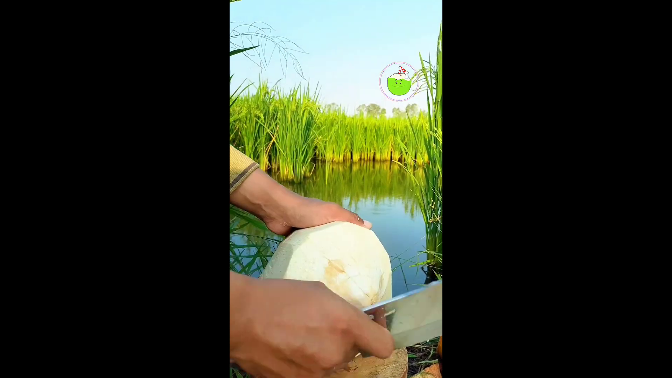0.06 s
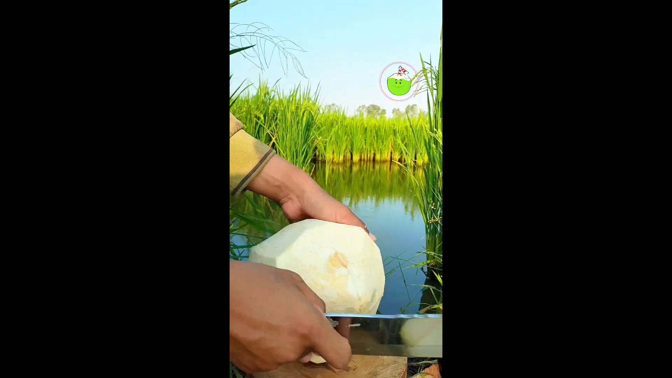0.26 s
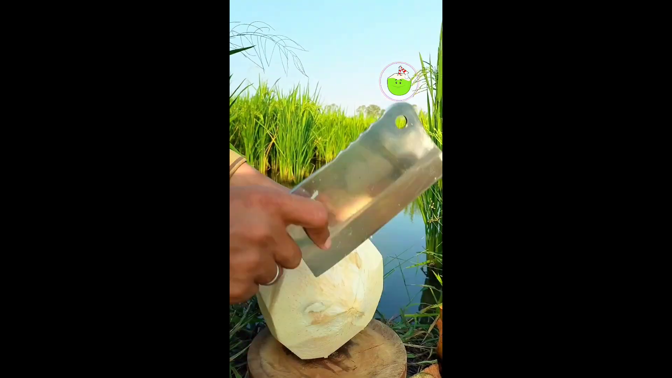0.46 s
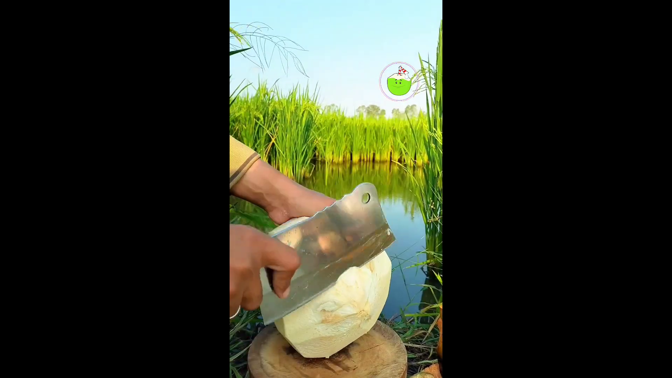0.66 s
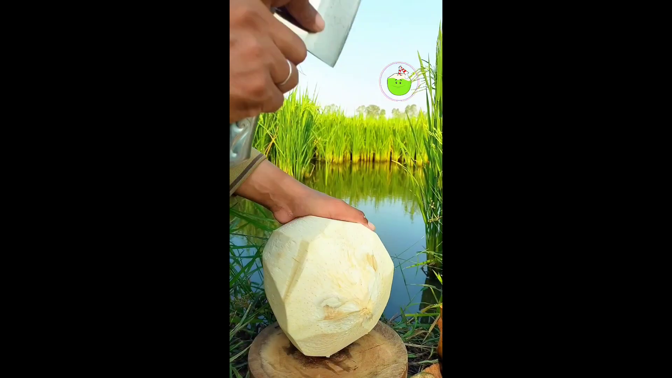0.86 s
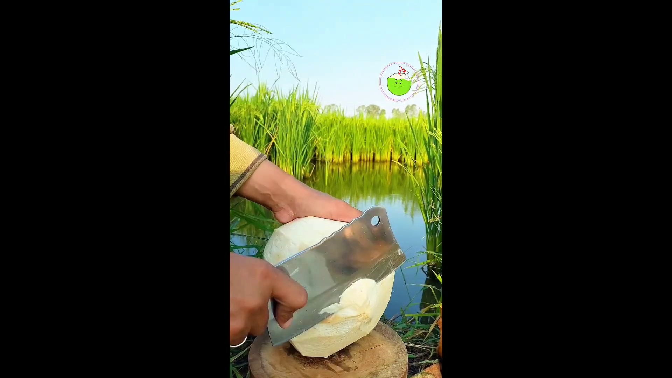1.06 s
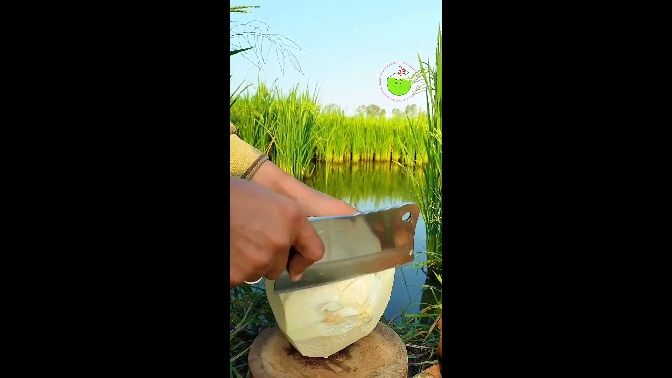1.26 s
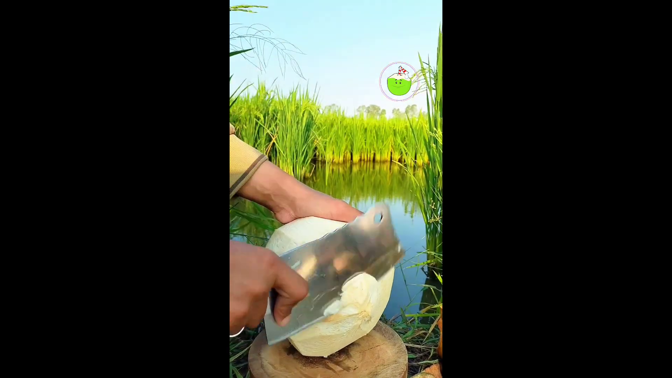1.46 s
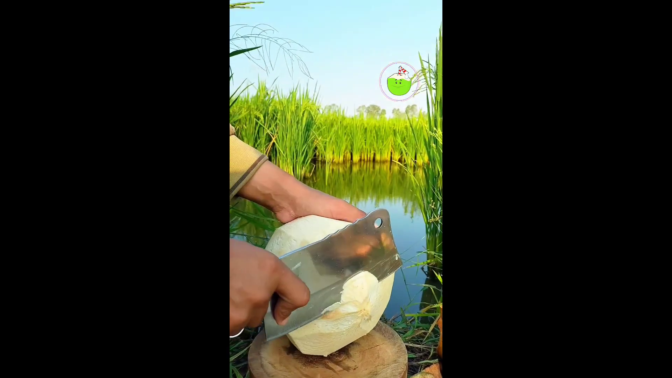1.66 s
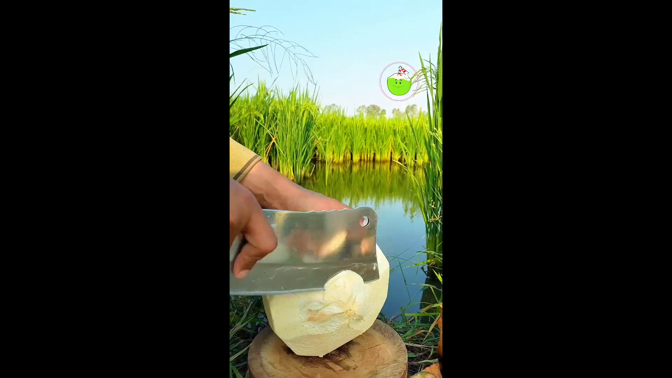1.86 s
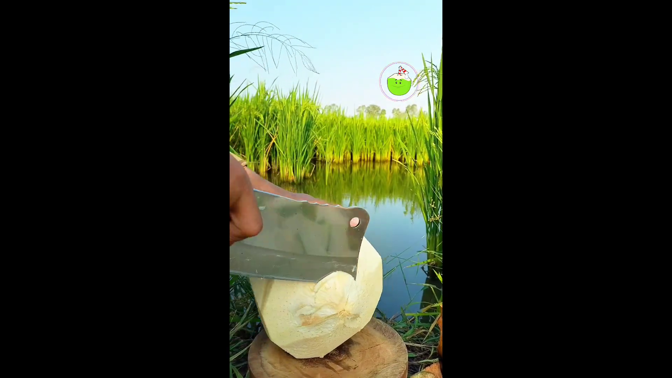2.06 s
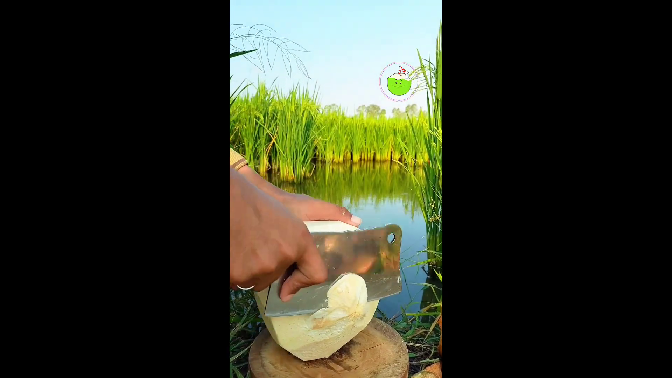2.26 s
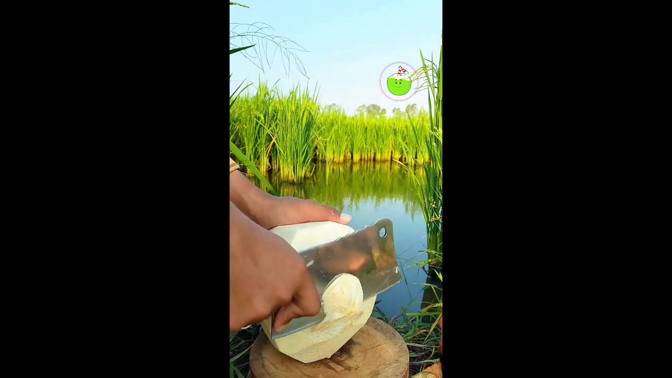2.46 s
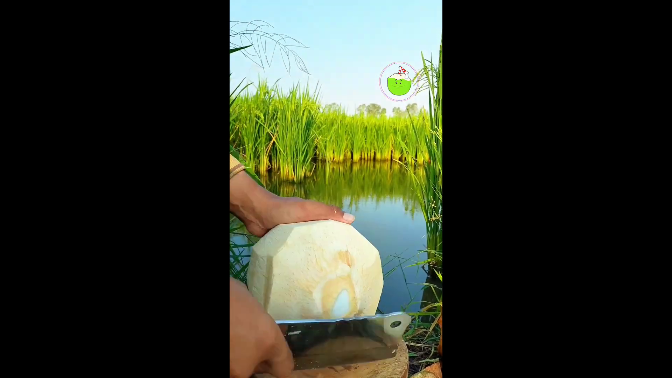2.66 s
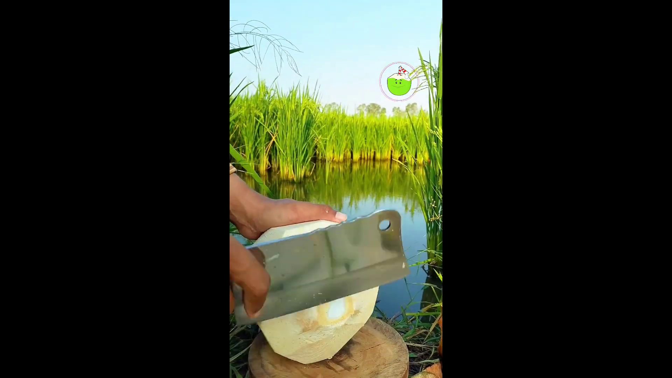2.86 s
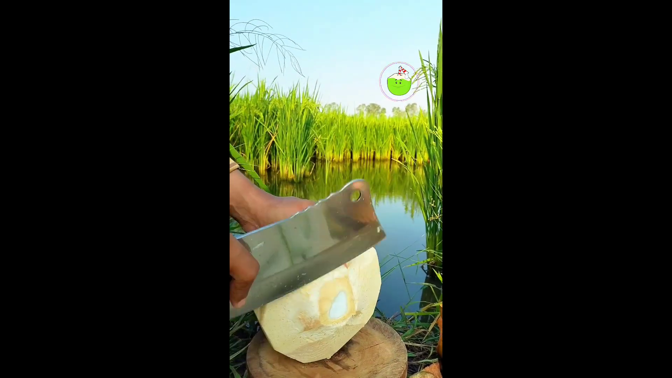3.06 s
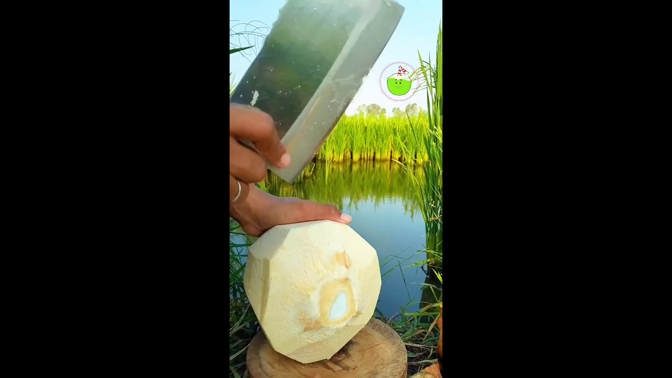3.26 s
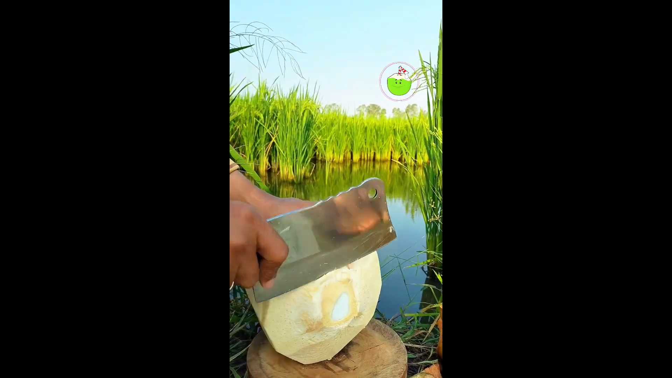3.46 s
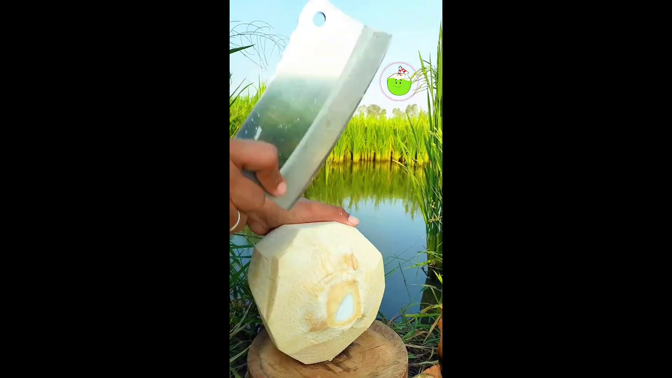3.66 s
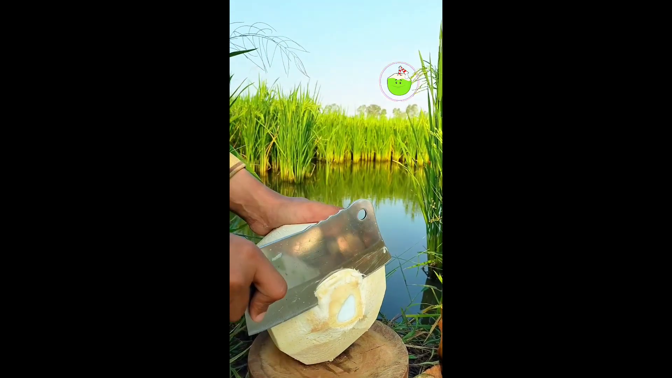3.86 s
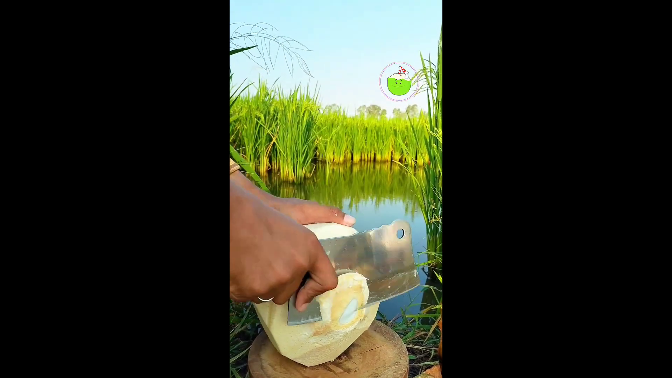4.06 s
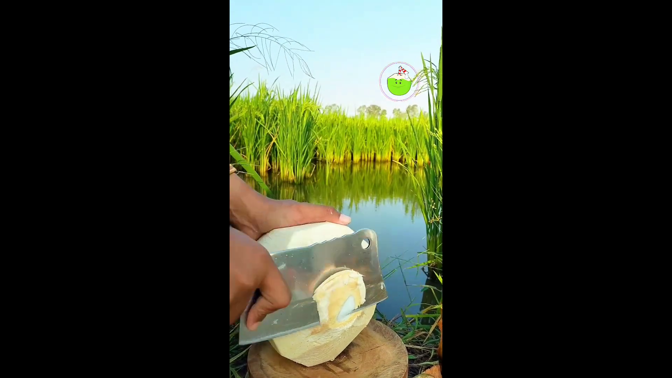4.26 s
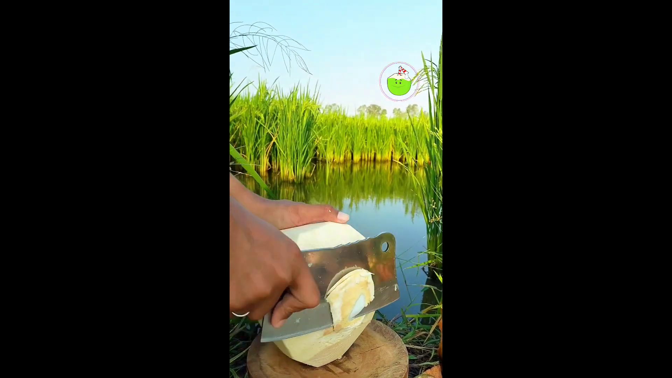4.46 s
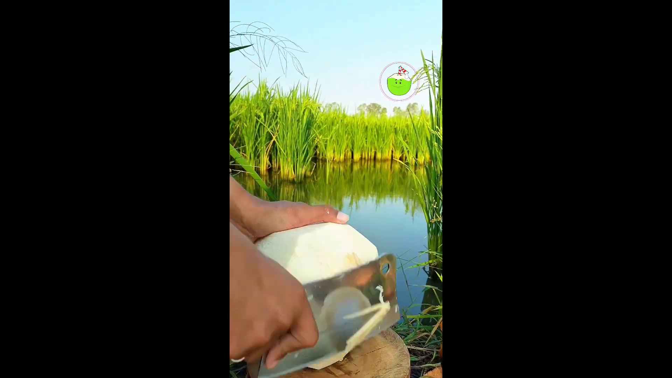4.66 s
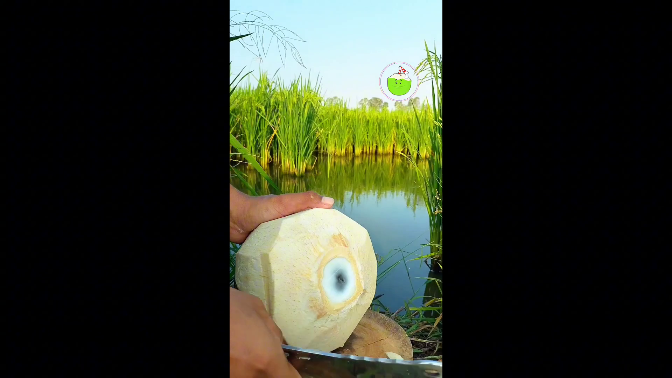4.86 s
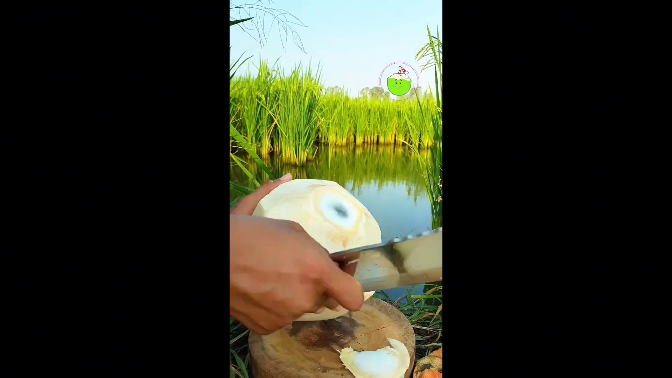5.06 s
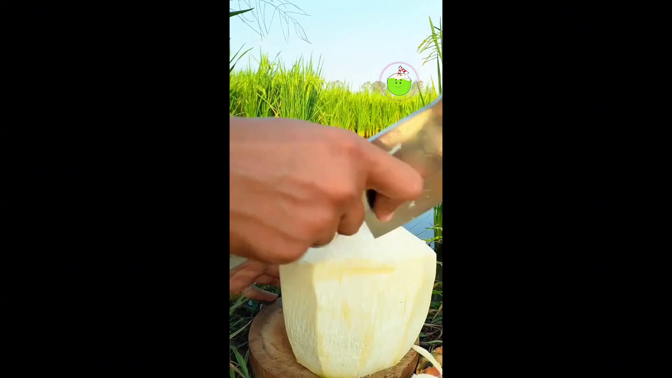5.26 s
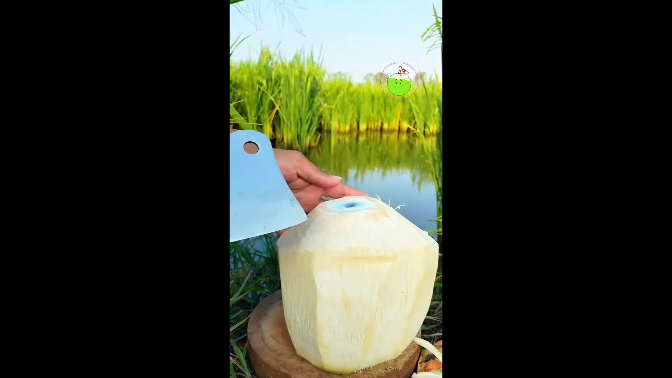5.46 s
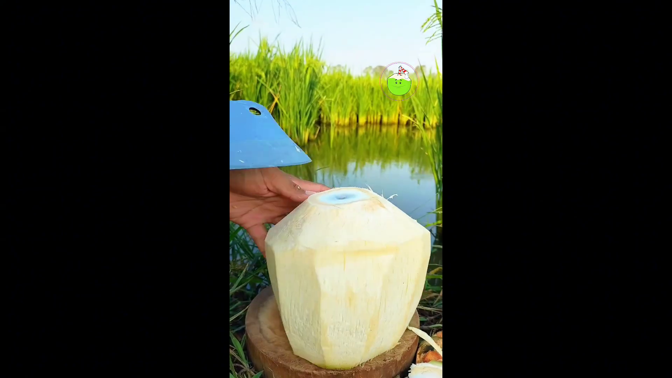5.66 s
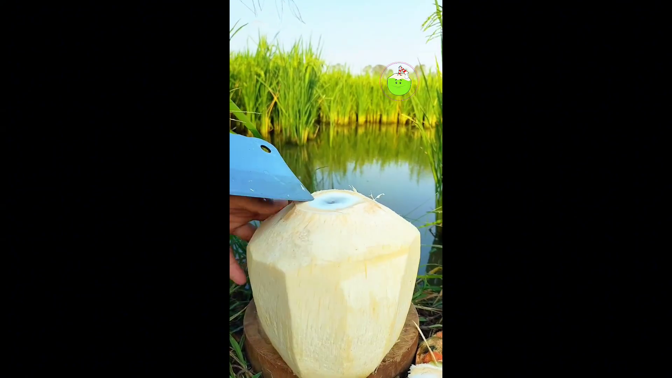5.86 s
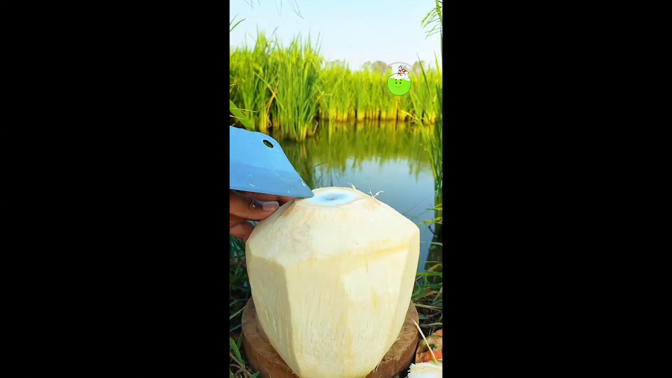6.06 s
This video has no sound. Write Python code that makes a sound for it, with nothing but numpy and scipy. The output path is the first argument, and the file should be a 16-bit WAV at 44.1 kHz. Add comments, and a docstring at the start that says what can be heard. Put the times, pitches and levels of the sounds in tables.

```python
"""A cleaver chops and shaves the husk of a green coconut on a wooden block beside a pond.
A low rumble and airy hiss last throughout. At first faint whistles, chirrups on the left and a soft brush are heard.
Then chops begin, each a burst of fibres, a nut knock, a block thump and a faint blade ring, with noisy shaving between.
From one second a run of rising whistles on the right swells into echoes from the bank until nearly three.
Chirrups, sparser whistles and clusters of blows follow; soft rubbing and short whistles come last."""
import sys
import numpy as np
from scipy import signal
from scipy.fft import rfft, irfft, next_fast_len
from scipy.io import wavfile
from scipy.ndimage import map_coordinates

SR = 44100
rng = np.random.default_rng(int(sys.argv[2]) if len(sys.argv) > 2 else 0)


def file_out(sig):
    """Save sig as 16-bit WAV at sys.argv[1]."""
    # one column per channel
    cols = np.atleast_2d(sig).T
    # limit, then scale
    lim = np.clip(cols, -1, 1)
    pcm = np.round(lim * 32767).astype(np.int16)
    wavfile.write(sys.argv[1], SR, pcm)


N = 269892

# How long the bank's echo lasts in each band. Each row: frequency in Hz, time to fall by 60 dB in s.
BANK_DECAY = [(500, 0.14), (3000, 1.15), (5000, 1.115), (8000, 0.39)]


def amp(db):
    """Decibels to a linear factor."""
    return 10 ** (np.asarray(db) / 20)


def unit(x):
    """Scale a sound to an rms of 1."""
    return x / np.sqrt(np.mean(x ** 2) + 1e-20)


def along(points, hz):
    """Read a curve of (Hz, value) points on a log frequency axis."""
    f, v = np.transpose(points)
    return np.interp(np.log(hz + 1), np.log(f + 1), v)


def filtered(x, response):
    """Shape the spectrum of x by a response that is a function of frequency."""
    n = x.shape[-1]
    padded = next_fast_len(n + 4096)
    hz = np.fft.rfftfreq(padded, 1 / SR)
    return irfft(rfft(x, padded) * response(hz), padded)[..., :n]


def add(track, s, sound):
    """Mix a stereo sound in at time s."""
    start = max(round(s * SR), 0)
    part = sound[:, :max(N - start, 0)]
    track[:, start:start + part.shape[1]] += part


def noise(spectrum, size, apart_hz, spiky_db=0):
    """Stereo noise of rms 1: snaps of uneven size, nearly alike in both ears well below apart_hz."""
    snaps = rng.standard_normal((2, size)) * amp(spiky_db * rng.standard_normal(size))

    def mid_side_response(hz):
        width = np.array([np.ones_like(hz), hz / np.hypot(hz, apart_hz)])
        return amp(along(spectrum, hz)) * width

    mid, side = filtered(snaps, mid_side_response)
    return unit(np.array([mid + side, mid - side]))


def ring(modes, t):
    """Sum damped modes of (Hz, dB, t60 s), struck at new strengths and signs each time."""
    strengths = rng.choice([-1, 1], len(modes)) * amp(2 * rng.standard_normal(len(modes)))
    total = 0
    for strength, (hz, db, t60) in zip(strengths, modes):
        total = total + strength * amp(db - 60 * t / t60) * np.sin(2 * np.pi * hz * t)
    return total


def wavering(t):
    """A smooth random wander of pitch, with 260 new random points a second."""
    return map_coordinates(rng.standard_normal(256), [t * 260], mode="mirror")


def placed(x, pan_db, lead):
    """Set a source on the right: louder there by pan_db, and earlier by lead seconds."""
    ears = np.array([[-1], [1]])
    shifted = filtered(x, lambda hz: np.exp(1j * np.pi * hz * lead * ears))
    return shifted * amp(ears * pan_db / 2)


def echo(x, decay, build):
    """A new diffuse stereo tail that swells over build seconds and dies at its own pace in each band."""
    hz, t, z = signal.stft(rng.standard_normal((2, SR)), SR, nperseg=256)
    fall = amp(-60 * t / along(decay, hz)[:, None])
    tail = signal.istft(z * fall * (1 - np.exp(-t / build)), SR, nperseg=256)[1]
    return signal.fftconvolve(x[None], tail / np.linalg.norm(tail[0]), axes=1)


def chops(crack_db=-3, slab_db=2, nut_db=0, pulp_db=-4, thump_db=2, blade_db=-27, debris_db=-28,
          slab_cycles=20, stop=0.002, ground_db=-31):
    """Fibres burst while the edge travels; the nut knocks, the block thumps and the steel rings on."""
    # Blade blows, levels before the trims above.
    # Each row: start in s, crack level in dB, slab level in dB, slab pitch in Hz, kind of blow.
    blows = [(.6848, -27, -34.5, 1000, "tap"), (1.0428, -16.5, -22, 370, "chop"),
             (1.5208, -14.5, -22, 617, "chop"), (1.802, -55, -39, 930, "tap"),
             (2.520, -14, -33, 736, "snap"), (2.5265, -13.5, -35, 825, "snap"),
             (2.5437, -12, -13, 1050, "through"), (2.5557, -23, -21, 1400, "snap"),
             (3.1422, -30.5, -35.5, 664, "tap"), (3.4016, -20.5, -18.5, 520, "chop"),
             (3.7617, -17.5, -14.5, 744, "chop"), (4.031, -41, -58, 897, "snap"),
             (4.328, -45, -34, 760, "snap"), (4.666, -24, -32.5, 790, "snap"),
             (4.7004, -25.5, -7.5, 1353, "snap"), (4.7018, -14.5, -7.5, 1750, "snap"),
             (4.7063, -12.5, -42, 620, "through"), (5.251, -53, -35.5, 530, "tap"),
             (5.262, -46, -48, 456, "through")]
    # How the blade meets the nut, by kind: cutting time in s, push on the nut in dB,
    # thump of the block in dB before its trim, thump pitch in Hz.
    blow_kinds = {"tap": (.008, -1, -32, 115), "chop": (.005, 0, -21, 98), "snap": (0.0018, -3, -38, 150),
                  "through": (.0027, 7, -21, 168)}
    # Modes of the nut, then of the blade. Each row: pitch in Hz, relative level in dB, time to fall by 60 dB in s.
    nut_modes = [(239, -4.5, 0.039), (346, -6.5, 0.037), (546, -2, 0.036), (620, -4.5, 0.035),
                 (840, -24, 0.027), (1130, -14, 0.018), (1427, -15.5, 0.051), (2152, -9, 0.037)]
    blade_modes = [(4150, -9, 0.16), (4870, -2, 0.056), (5270, -5.5, 0.11), (6650, -22, 0.2),
                   (7180, -21, 0.122), (7900, -14, .09), (9500, -7.5, 0.12)]
    # Spectra of the bursting fibres and of the pulp's dull crunch. Each row: frequency in Hz, relative dB per Hz.
    fibre_spectrum = [(200, 9), (700, -3), (1400, -2.5), (2600, -1), (4400, 6.5), (6500, 0.5), (8500, -1.5),
                      (12000, -6), (16000, -12.5)]
    pulp_spectrum = [(100, -11.5), (350, -1), (650, 8.5), (1200, 3), (2200, -17.5), (4000, -38),
                     (9000, -54)]
    even_slab_hz, spared_db_per_octave = 620, 12

    out, t = np.zeros((2, N)), np.arange(SR // 4) / SR
    for s, crack, split, slab_hz, kind in blows:
        cut, push, thump, thump_hz = blow_kinds[kind]
        # a thick slab passes the blow on to the nut; thin, high-pitched ones spare it
        octaves_thin = max(np.log2(slab_hz / even_slab_hz), 0)
        hollow = split + push - spared_db_per_octave * octaves_thin
        # the edge cuts at full force, most strongly at first, then stops
        travel = np.exp(-np.maximum(t - cut, 0) / stop) * (1 + 0.34 * np.exp(-t / 0.00074))
        crumbs = amp(debris_db - 60 * t / 0.18)
        burst = noise(fibre_spectrum, len(t), apart_hz=4500, spiky_db=2.0)
        fibres = amp(crack + crack_db) * (travel + crumbs) * burst
        pulp = amp(hollow + pulp_db) * travel * noise(pulp_spectrum, len(t), apart_hz=3930)
        # the slab being split off rings for a few cycles at its own pitch
        slab = amp(split + slab_db - 60 * t * slab_hz / slab_cycles) * np.sin(2 * np.pi * slab_hz * t)
        nut = amp(hollow + nut_db) * ring(nut_modes, t)
        block = amp(thump + thump_db - 60 * t / 0.061) * np.sin(2 * np.pi * thump_hz * t)
        block *= 1 - np.exp(-t / 0.0004)
        steel = amp(crack + blade_db) * np.array([ring(blade_modes, t) for ear in range(2)])
        # the husk gives a little before it bursts
        give = 1 - np.exp(-t / 0.00025)
        blow = (fibres + pulp + slab + nut - block + steel) * give
        add(out, s, placed(blow, pan_db=3.0, lead=.00005))
        add(out, s, amp(ground_db) * echo(blow[0], [(300, 0.24), (4000, 0.069)], build=0.0049))
    return out


def shaving(hiss_db=1, rasp_db=0, catch_rate=260, catch_db=2.5, cavity_hz=810, cavity_db=1):
    """The edge catches and slips through wet fibres, and the nut gives the rasp a hollow colour."""
    # Strokes of edge or hand. Each row: middle in s, half length in s, level in dB before the trims, touch.
    strokes = [(0.333, 0.22, -60.5, "brush"), (.778, 0.02, -55.5, "slice"), (1.298, 0.021, -54, "slice"),
               (1.892, .07, -58, "skim"), (2.212, 0.035, -45, "slice"), (2.319, .019, -52.5, "slice"),
               (2.53, 0.036, -34.5, "slice"), (3.522, 0.011, -54, "skim"), (3.98, 0.0018, -46, "skim"),
               (4.085, 0.044, -39, "slice"), (4.248, 0.067, -49, "skim"), (4.333, 0.014, -39, "slice"),
               (4.546, 0.043, -53, "skim"), (4.684, 0.017, -27.5, "slice"), (4.777, 0.013, -49.5, "rub"),
               (5.187, .012, -40, "rub"), (5.229, .039, -40.5, "rub"), (5.443, 0.11, -56, "brush"),
               (5.801, 0.15, -52, "rub")]
    # How edge or hand slides, by touch: fibre hiss and hollow rasp, in dB relative to the stroke.
    touches = {"slice": (0, -6.5), "skim": (0, -9.5), "brush": (0, 0), "rub": (-25, 0)}
    # Spectra of the fibre hiss and of the rasp. Each row: frequency in Hz, relative dB per Hz.
    hiss_spectrum = [(500, -5.5), (1500, -3), (3200, 13), (6000, 3.5), (9000, 5), (16000, -5.5)]
    rasp_spectrum = [(100, -5), (300, -7), (550, -11), (820, -21), (1300, -5.5), (2200, -20.5), (5000, -27),
                     (12000, -38.5)]

    t, hiss, rasp = np.arange(N) / SR, np.zeros(N), np.zeros(N)
    for s, half, db, touch in strokes:
        fibre_db, hollow_db = touches[touch]
        push = amp(db) * np.exp(-np.minimum(((t - s) / half) ** 2, 100) * 1.42)
        hiss += amp(fibre_db + hiss_db) * push
        rasp += amp(hollow_db + rasp_db) * push
    # catch and slip: a random level that wanders catch_rate points a second
    wander = map_coordinates(rng.standard_normal(N // 20), [t * catch_rate], mode="mirror")
    catches = unit(amp(catch_db * wander))

    def cavity_response(hz):
        return 1j * hz / (cavity_hz ** 2 - hz ** 2 + 1j * hz * 130)  # 130 Hz wide

    cavity = unit(filtered(catches * rng.standard_normal(N), cavity_response))
    scrape = catches * noise(rasp_spectrum, N, apart_hz=3000, spiky_db=7)
    body = unit(scrape + amp(cavity_db) * cavity)
    fibres = catches * noise(hiss_spectrum, N, apart_hz=5000, spiky_db=9.0)
    return placed(hiss * fibres + rasp * body, pan_db=3.5, lead=.00004)


def chirrups(warble_hz=95, scoop_hz=190, second_db=-14, below_hz=380, direct_db=1, bank_db=-5,
             reeds_db=-5, pan_db=17, bank_pan_db=9):
    """Warbling notes scoop up, close on the left; the syrinx's other side adds a weak lower voice."""
    # The near bird's notes. Each row: start in s, length in s, middle pitch in Hz before the scoop,
    # level in dB before the direct and echo trims, kind of note.
    notes = [(.14, .14, 2977, -23.5, "trill"), (0.654, .13, 3045, -27, "trill"),
             (1.201, 0.092, 2748, -37, "trill"), (1.526, 0.059, 3120, -30, "trill"),
             (1.803, .095, 3153, -26.5, "trill"), (2.097, .092, 3040, -26, "trill"),
             (2.706, 0.064, 3086, -26.5, "fall"), (2.764, 0.11, 3005, -26, "fall"),
             (2.973, 0.07, 3290, -30.5, "pip"), (3.058, 0.11, 3053, -24.5, "trill"),
             (3.298, .12, 3074, -25.5, "trill"), (3.459, 0.062, 2806, -35, "fall"),
             (4.62, 0.049, 2859, -26.5, "fall"), (4.842, 0.056, 3110, -24, "pip"),
             (4.883, 0.05, 2890, -29.5, "fall"), (5.063, 0.069, 3080, -23.5, "pip")]
    # Pitch movement by kind of note: glide in Hz, warble depth in Hz (shared by the warble and a random waver).
    note_kinds = {"trill": (130, 170), "fall": (-190, 105), "pip": (70, 70)}

    out = np.zeros((2, N))
    for s, length, middle_hz, db, kind in notes:
        glide_hz, depth_hz = note_kinds[kind]
        t = np.arange(int(length * SR)) / SR
        u = t / length
        waver = wavering(t)
        # longer notes start from further below
        scoop = scoop_hz * (length / 0.0948) * (1 / 4 - np.exp(-u / 0.2482))
        warble = depth_hz * (np.sin(2 * np.pi * warble_hz * t) + waver) / 2
        hz = middle_hz + glide_hz * (u - .5) + scoop + warble
        phase = 2 * np.pi * np.cumsum(hz) / SR
        lower_voice = np.sin(phase - 2 * np.pi * below_hz * t + waver)
        voices = np.sin(phase) + amp(second_db) * lower_voice
        swell = np.sqrt(np.abs(np.sin(np.pi * u ** 1.5)))
        note = amp(db) * swell * voices
        add(out, s, note * amp([[direct_db], [direct_db - pan_db]]))
        add(out, s, echo(note, BANK_DECAY, build=0.0059) * amp([[bank_db], [bank_db - bank_pan_db]]))
        # a short echo from the reeds
        add(out, s, echo(note, [(3000, 0.108)], build=0.0018) * amp([[reeds_db], [reeds_db - pan_db]]))
    return out


def whistles(direct_db=0.0, echo_db=-0.5, pan_db=10, echo_pan_db=4, beaming_db=8):
    """Clean slurs from the far bank on the right, each smeared into a long echo."""
    # Single whistles. Each row: start in s, level in dB before the throat's gain, syllable.
    single_whistles = [(.053, -43, "low"), (0.281, -43.5, "low"), (0.536, -43, "low"), (.76, -41, "middle"),
                       (0.809, -32.5, "middle"), (1.04, -34.5, "middle"), (1.615, -42, "low"),
                       (3.571, -52.5, "low"), (4.17, -50.5, "thin"), (5.345, -36, "buzz"),
                       (5.544, -46, "chip"), (5.736, -43, "chip")]
    # The far birds' syllables, by name: length in s, first pitch in Hz, last pitch in Hz, waver in Hz.
    syllables = {"low": (.1, 2930, 3790, 12), "middle": (.105, 3250, 5200, 38),
                 "high": (.097, 4200, 6950, 44), "thin": (.13, 4120, 4650, 55),
                 "buzz": (.19, 4300, 4560, 170), "chip": (0.025, 5100, 3100, 164)}
    # How strongly the throat gives each pitch. Each row: frequency in Hz, gain in dB.
    throat_gain = [(2500, 15), (3500, 3), (4800, -3), (5400, -9), (6800, -11)]
    # A high slur scoops up, lingers, climbs. Each row: share of its length, share of its rise.
    slur_contour = [(0, -.1), (.1, .09), (.4, .3), (.7, .78), (1, .93)]

    out = np.zeros((2, N))
    for s, db, syllable in single_whistles + song_run(count=7):
        length, first, last, waver_hz = syllables[syllable]
        t = np.arange(int(length * SR)) / SR
        u = t / length
        # only the highest slurs bend
        rise = np.interp(u, *np.transpose(slur_contour)) if syllable == "high" else u
        hz = first + (last - first) * rise + waver_hz * wavering(t)
        swell = np.sin(np.pi * u) ** 0.37
        note = amp(db + along(throat_gain, hz)) * swell * np.sin(2 * np.pi * np.cumsum(hz) / SR)
        # the top of a slur reaches the listener mostly by scattering
        beaming = beaming_db * np.clip((hz - 4900) / 600, 0, 1)
        straight = note * amp(direct_db - beaming)
        add(out, s, straight * amp([[-pan_db], [0]]))
        add(out, s, echo(note, BANK_DECAY, build=0.0012) * amp([[echo_db - echo_pan_db], [echo_db]]))
    return out


def song_run(count):
    """The song's peak: an almost even run of high slurs that slows a little and grows louder."""
    start_s, gap_s, slowing_s = 1.085, .2605, .0035
    first_db, swell_db = -33.5, 1.36  # first slur before the throat's gain, step from slur to slur
    rows = []
    for k in range(count):
        s = start_s + k * gap_s + slowing_s * k * (k - 1) / 2
        rows.append((s, first_db + k * swell_db, "high"))
    return rows


def outdoors(rumble_db=-42.0, air_db=14.0):
    """A distant rumble, and air moving in the reeds: two shaped noises, the air with a drifting level."""
    # Spectra of the rumble and of the airy hiss. Each row: frequency in Hz, relative dB per Hz.
    rumble_spectrum = [(15, -16.5), (30, -16), (45, 3), (60, 4.5), (85, 8), (130, 4), (190, 2.5),
                       (280, -3.5), (440, -19.5), (650, -19.5), (900, -42.5), (1400, -80)]
    air_spectrum = [(400, -14.5), (800, 2), (1800, -1.5), (3200, 7), (5000, -4), (7000, -9.5), (8600, -6),
                    (10000, -15), (16000, -18)]
    # Drift of the airy hiss. Each row: time in s, level in dB before air_db is added.
    air_drift = [(0.0, -67.5), (0.32, -68), (1.07, -75.5), (2.61, -65), (3.02, -71), (3.99, -73),
                 (4.18, -69.5), (4.38, -70.5), (5.25, -66.5), (6.12, -72)]

    level = np.interp(np.arange(N) / SR, *np.transpose(air_drift))
    rumble = amp(rumble_db) * noise(rumble_spectrum, N, apart_hz=756)
    air = amp(level + air_db) * noise(air_spectrum, N, apart_hz=1190)
    return rumble + air


def scene():
    """Cleaver, birds and pond side together."""
    return chops() + shaving() + chirrups() + whistles() + outdoors()


def record(dry, low_cut_hz=30, top_hz=16200):
    """The microphone sheds the deepest bass, and nothing is kept above the band limit."""
    return filtered(dry, lambda hz: 1j * hz / (low_cut_hz + 1j * hz) * (hz < top_hz))


dry = scene()
out = record(dry)
file_out(out)
```